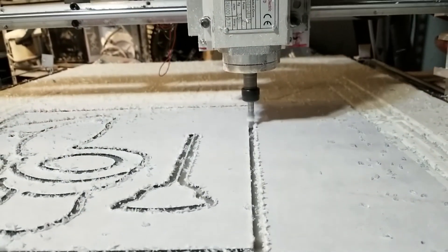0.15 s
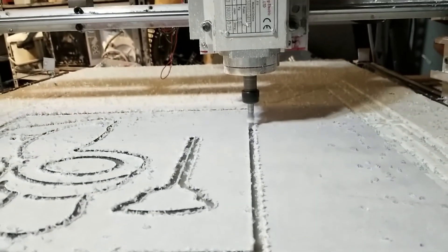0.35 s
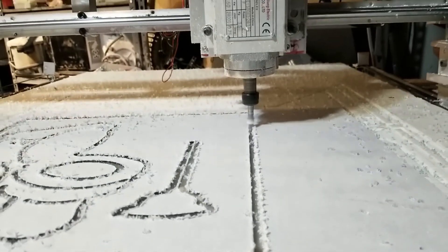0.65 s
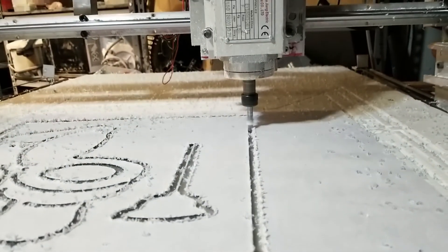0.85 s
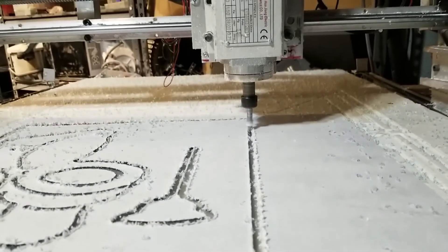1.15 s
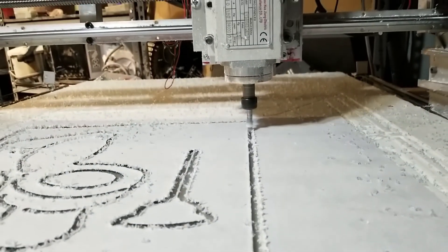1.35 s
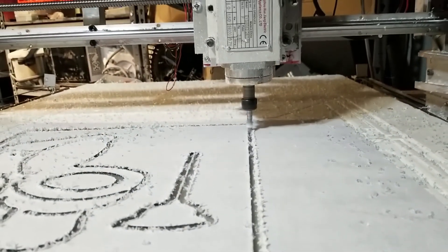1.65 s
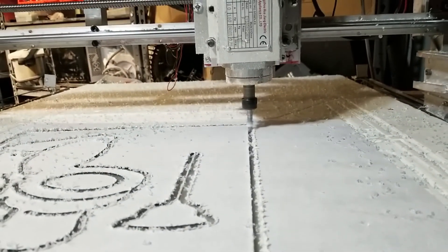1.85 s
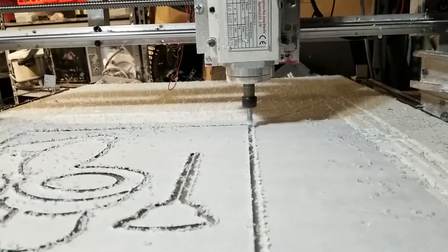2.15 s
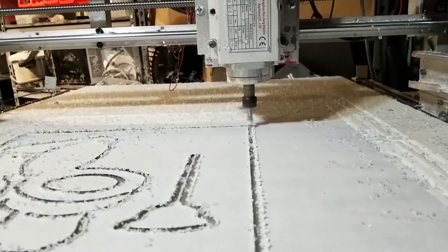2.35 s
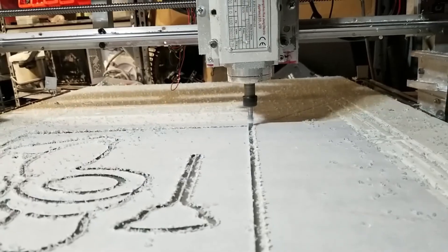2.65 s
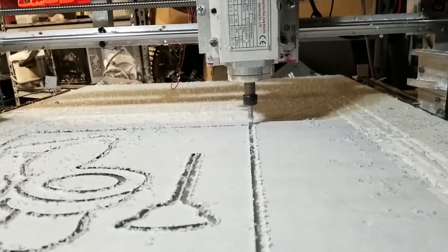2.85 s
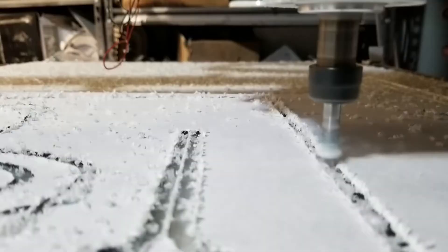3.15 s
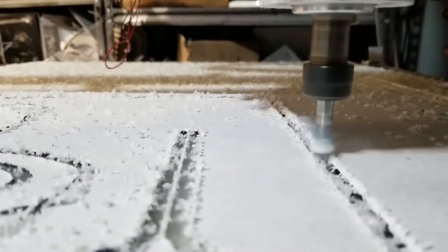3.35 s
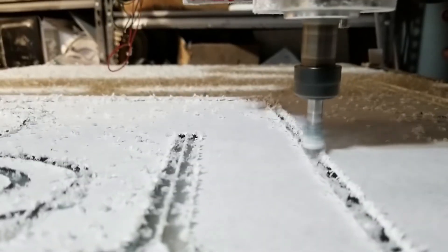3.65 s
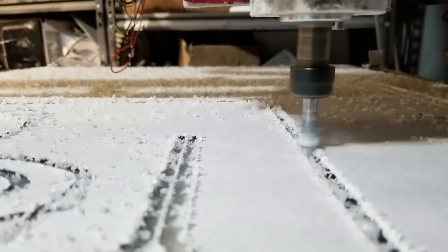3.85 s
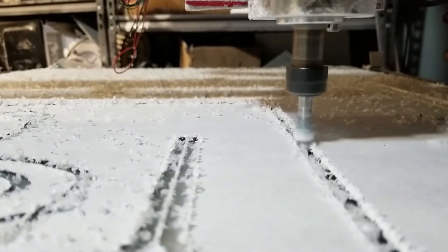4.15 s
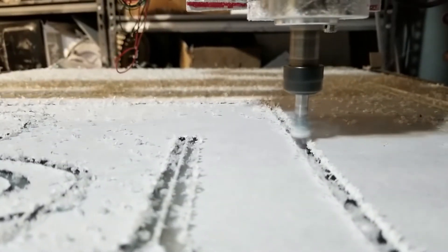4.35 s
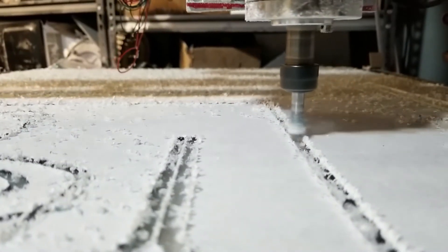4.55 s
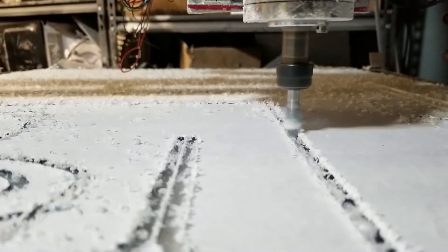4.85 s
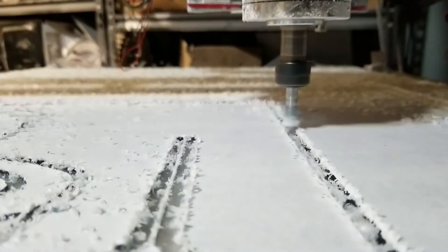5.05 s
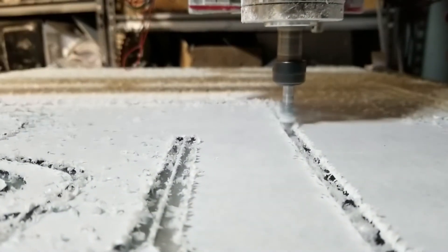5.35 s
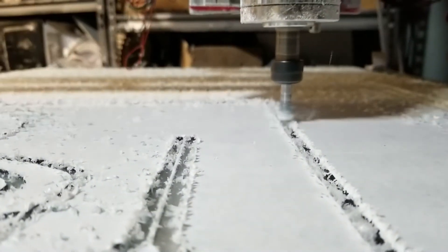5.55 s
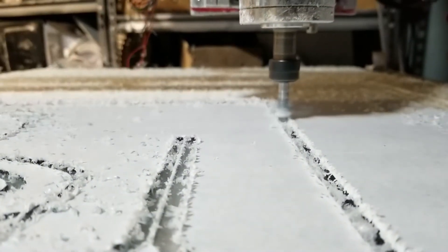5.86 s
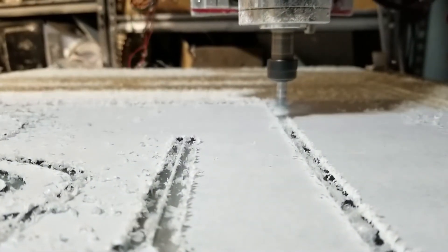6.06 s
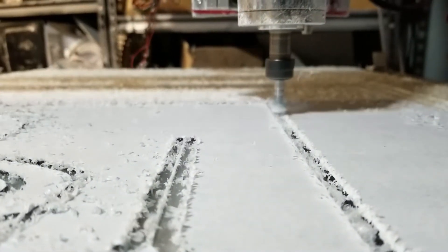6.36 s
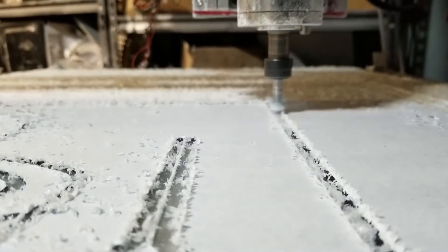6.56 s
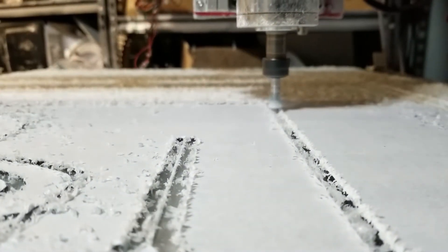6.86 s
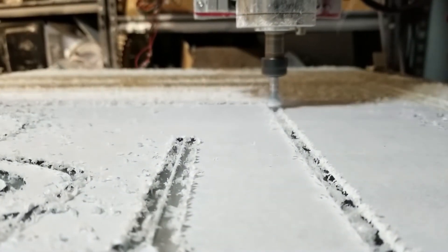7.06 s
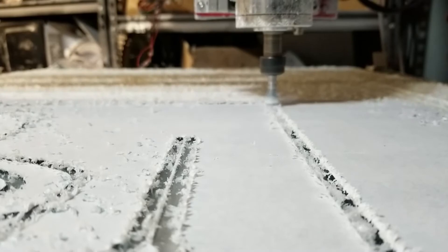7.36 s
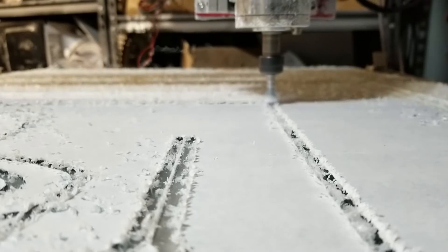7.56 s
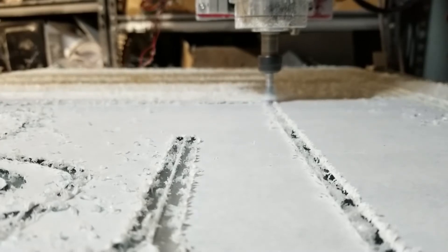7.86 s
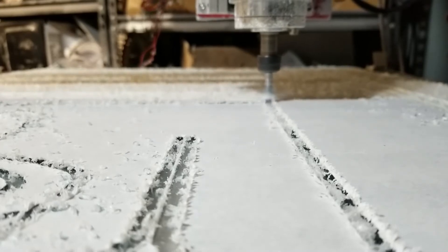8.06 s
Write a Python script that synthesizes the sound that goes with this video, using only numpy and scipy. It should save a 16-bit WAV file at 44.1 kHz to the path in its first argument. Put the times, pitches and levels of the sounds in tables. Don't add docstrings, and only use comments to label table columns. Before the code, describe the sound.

A steady router whine with bright, rapidly throbbing chip hiss, easing off briefly around three seconds, then returning closer before thinning again at the end.

```python
import sys
import numpy as np
from scipy import signal
from scipy.fft import rfft, irfft, next_fast_len
from scipy.io import wavfile
from scipy.ndimage import uniform_filter1d

SR = 44100
rng = np.random.default_rng(int(sys.argv[2]) if len(sys.argv) > 2 else 0)


def boost_factor(decibels):
    exponent = np.asarray(decibels, float) / 20
    return 10 ** exponent


def dump_mix(stems):
    frames = np.atleast_2d(stems).T
    limited = np.clip(frames, -1, 1)
    pcm = np.round(limited * 32767).astype(np.int16)
    wavfile.write(sys.argv[1], SR, pcm)


N = 362502
MOVE_S = 3.04


def rms_one(x):
    return x / np.sqrt(np.mean(x ** 2) + 1e-20)


def seconds():
    return np.arange(N) / SR


def in_time(rows):
    s, *columns = np.transpose(rows)
    return [np.interp(seconds(), s, c) for c in columns]


def at_hz(points, hz):
    table = np.array(points)
    return np.interp(np.log(hz), np.log(table[:, 0]), table[:, 1])


def spectrum_axis():
    size = next_fast_len(N)
    return size, np.arange(size // 2 + 1) * SR / size + 1


def drift(rate):
    r = np.exp(-80 * np.pi * rate / SR)
    white = rng.standard_normal(N // 40 + 2002)
    slow = signal.lfilter([1], [1, -2 * r, r * r], white)[2000:]
    return np.interp(np.arange(N) / 40, np.arange(len(slow)), rms_one(slow - slow.mean()))


def colour(x, spectrum, modes):
    size, hz = spectrum_axis()
    level_db = at_hz(spectrum, hz)
    for mode_hz, width_hz, db in modes:
        level_db = level_db + db / (1 + (2 * (hz - mode_hz) / width_hz) ** 2)
    return irfft(rfft(x, size) * boost_factor(level_db), size)[..., :N]


# time in seconds, share locked to the feed steps.
FEED_EVENNESS = [(0, 4.9), (2.6, 3), (2.8, 0.27), (3.04, 3.1), (8.22, 0.3)]


def throb():
    steps = 2 * np.pi * 40 * seconds() - .9 + 0.093 * drift(0.83)
    beat = np.sin(steps) + 0.28 * np.sin(2 * steps) + 0.083 * np.sin(3 * steps)
    beat = in_time(FEED_EVENNESS)[0] * beat
    lurch = np.cos(2 * np.pi * 24.0 * seconds() + 3.54 * drift(1.57))
    return 1.655 * np.tanh((beat + 2.03 * lurch + 1.23 * drift(70)) / 1.94)


# time in seconds, unbalance as first-order level in dB,
# flute load as fourth-order level in dB.
SPINDLE_SHAKE = [(0, -31, -33.5), (.8, -30, -35), (1.5, -32, -33.5), (2.2, -35.5, -30.5), (2.6, -33.5, -36),
                 (2.81, -33, -39.5), (2.91, -28, -42), (2.99, -33, -52), (3.036, -30.5, -45),
                 (3.046, -39, -32.5), (4.3, -35.5, -33.5), (5.4, -33.5, -31.5), (6.4, -31.5, -30.5),
                 (7.45, -38.5, -31), (7.85, -41.5, -32.5), (7.9, -43, -57), (8.11, -42, -41),
                 (8.18, -31.5, -47)]
# time
# in seconds, level in dB.
SECOND_ORDER = [(0, -36.5), (1.8, -32.5), (2.6, -37.5), (2.86, -45), (3.03, -40.5), (3.045, -95),
                (7.3, -52), (8.22, -65)]


def order_levels():
    t = seconds()
    first_db, fourth_db = in_time(SPINDLE_SHAKE)
    second_db, = in_time(SECOND_ORDER)
    node_db = -10.5 * np.exp(-((t - 2.33) / 0.087) ** 4)
    start_s, end_s, lurch_hz = 2.49, 2.85, 15.3
    free = (t > start_s) & (t < end_s)
    stutter_db = -20 * free * np.sin(np.pi * lurch_hz * (t - start_s)) ** 4
    levels = [first_db + node_db + 0.18 * stutter_db,
              second_db + node_db,
              fourth_db + stutter_db + 6.0 * free]
    return [db - 0.3 * drift(4.5) + 0.72 * drift(15.5) for db in levels]


# multiple of the spindle speed, level from far in dB, level from near in dB.
WEAK_ORDERS = [(3, -63, -58), (5, -52.5, -53), (6, -57, -56.5), (7, -57, -63), (8, -57, -58.5),
               (9, -74, -56.5)]
# multiple of the spindle speed,
# start in seconds, end in seconds, lift in dB.
SINGING_PANEL = [(3, -.3, 2.2, 14), (6, -.3, 1.2, 10), (7, 1.9, 2.5, 8), (7, 3.04, 4.6, 16),
                 (8, 1.8, 2.6, 6), (8, 3.8, 6.9, 7), (5, 2.45, 2.8, 9), (9, 3.04, 4.2, 5)]


def whine(turns, first_db, second_db, fourth_db, load):
    t = seconds()
    # multiple, level dB, shake dB, spread between the ports
    orders = [(1, first_db, 0.3, 0.3), (2, second_db, 1.63, 0.39), (4, fourth_db, 1.35, 0.16)]
    for k, far_db, near_db in WEAK_ORDERS:
        level_db = np.where(t < MOVE_S, far_db, near_db) + 0.33 * (fourth_db + 40)
        for multiple, a, b, lift_db in SINGING_PANEL:
            if multiple == k:
                level_db = level_db + lift_db * np.interp(t, [a - .05, a, b - .2, b + 0.13], [0, 1, 1, 0])
        orders.append((k, level_db, 3.5, .8))
    out, flutter_db = 0, 0.41 * drift(10)
    for k, level_db, shake_db, spread in orders:
        flutter = flutter_db * (1.6 if k == 1 else 1)
        gain = np.sqrt(2) * boost_factor(level_db + shake_db * load + flutter)
        angle = 2 * np.pi * (k * turns + rng.random()) + 0.092 * drift(28)
        out = out + gain * (np.sin(angle) + spread * np.cos(angle) * [[1], [-1]])
    return out


def flute_strikes(turns):
    far = seconds() < MOVE_S
    sharp = np.clip(np.where(far, 0.82, 0.24) + 0.32 * drift(1.1), 0, 1)
    turn = (turns + .02 * drift(30)).astype(int)
    strength = boost_factor(2.0 * rng.standard_normal(turn.max() + 1))[turn]
    struck = (np.diff(turn, prepend=0) > 0) * strength
    puff = np.exp(-4.0 * (turns % 1)) + 0.079 * np.exp(-5.0 * ((turns + 0.9) % 1))
    gate = (1 - sharp) + sharp * rms_one(strength * puff)
    chip_size = boost_factor(1.8 * np.minimum(rng.exponential(1, N), 4))
    chips = (rng.random(N) < 1500.0 / SR) * rng.standard_normal(N) * chip_size
    noise = rng.standard_normal((3, N)) * gate
    direct = rms_one(noise[0]) + 1.85 * rms_one(struck) + 0.14 * rms_one(chips)
    return rms_one(direct), rms_one(noise[1:])


def echoes(size):
    t = np.arange(SR // 50) / SR
    scatter = rng.standard_normal((2, len(t))) * np.exp(-t / 0.0035)
    scatter[:, 0] += 8.0
    return rfft(scatter / np.linalg.norm(scatter, axis=1, keepdims=True), size)


# frequency in Hz, level in dB per Hz.
TOOL_SPECTRUM = [(2060, -23), (3500, -12.5), (4380, -12.5), (5520, 2.5), (5880, -2), (6310, -13.5),
                 (6770, -1.5), (8640, -7.5), (9270, -7.5), (11600, -5.5), (15100, -8.5), (15700, 4.5),
                 (16200, -44)]
# frequency in Hz, width in Hz, lift in dB.
TOOL_RESONANCES = [(5594, 160, 3.5), (5940, 88, -1.5), (6302, 180, 10), (7640, 31, -15), (9400, 160, 4),
                   (10100, 130, 0), (11200, 160, 0.5)]
# frequency in Hz, direct share from 0 to 1.
TOOL_DIRECT_SHARE = [(3500, 0.83), (6000, 1), (10000, 0.68), (16000, 0)]


def tool_response(direct, diffuse):
    size, hz = spectrum_axis()
    share = np.clip(at_hz(TOOL_DIRECT_SHARE, hz), 0, 1)
    alike = rfft(colour(direct, TOOL_SPECTRUM, TOOL_RESONANCES), size) * echoes(size)
    unlike = rfft(colour(diffuse, TOOL_SPECTRUM, TOOL_RESONANCES), size)
    return np.sqrt(share) * alike + np.sqrt(1 - share) * unlike


# time in seconds, level in dB.
CUT_DEPTH = [(0, -21.5), (.4, -22), (.96, -18.5), (1.5, -22), (2.15, -18), (2.42, -23), (2.46, -30),
             (2.56, -48), (2.95, -37.5), (3.036, -38), (3.044, -19), (4.1, -17.5), (5.8, -19.5),
             (6.6, -16.5), (7.74, -21), (7.78, -29), (7.89, -43), (8.15, -30)]
# time in seconds, centre of the ring in Hz, centre of the hiss in Hz.
TOOL_TRAVEL = [(0, 6000, 12500), (1.0, 5900, 10800), (2.4, 6240, 9000), (3.0, 5950, 9550),
               (3.07, 5600, 12300), (4.1, 6250, 12300), (5.4, 5620, 10950), (6.5, 5550, 12740),
               (8.22, 5870, 9500)]


def cutter(turns, load):
    hiss_db, = in_time(CUT_DEPTH)
    ring_hz, centre_hz = in_time(TOOL_TRAVEL)
    far = seconds() < MOVE_S
    ring_db = np.where(far, -4, -3) - 20.5 + 0.72 * (hiss_db + 20.5)
    depth_db = np.where(far, 4, 2.5)
    left, right = tool_response(*flute_strikes(turns))
    size, hz = spectrum_axis()
    place = 11 * np.log(hz / 3400) / np.log(16600 / 3400)
    ring, hiss = 0, 0
    for k in range(12):
        mask = np.cos(np.pi / 2 * np.clip(place - k, -1, 1)) ** 2
        band_hz = hz[mask.argmax()]
        near, even, odd = irfft(np.array([left, right, -1j * right]) * mask, size)[:, :N]
        turned = rng.uniform(-np.pi, np.pi) + 0.95 * drift(0.32)
        part = np.array([near, even * np.cos(turned) + odd * np.sin(turned)])
        part[1] *= near.std() / even.std()
        level_db = depth_db * (0.73 * load + 0.74 * drift(57)) + 1.0 * drift(3.8)
        if k < 6:
            level_db += 3.1 * np.exp(-(np.log(band_hz / ring_hz) / 0.12) ** 2)
            ring = ring + part * boost_factor(level_db)
        else:
            level_db += 0.069 * (k - 6) * np.minimum(hiss_db + 44, 0)
            level_db += 10.4 * np.exp(-(np.log(band_hz / centre_hz) / 0.57) ** 2)
            hiss = hiss + part * boost_factor(level_db)
    return boost_factor(ring_db) * rms_one(ring) + boost_factor(hiss_db) * rms_one(hiss)


def panel_bounce(x):
    out, at = x.copy(), np.arange(N)
    for lag_s, share in [(3.3e-4, 0.16), (8.5e-4, -0.28)]:
        late = at - lag_s * SR * (1 + .15 * drift(0.5))
        out += share * np.array([np.interp(late, at, side) for side in x])
    return out / 1.26


# mode in Hz, start in seconds, end in seconds, lift in dB.
PANEL_MODES = [(1850, 1, 3.56, 2), (2095, 3.8, 6.9, -1.5), (1580, 0.5, 1.2, 2), (1985, -1.8, 1.1, 5),
               (2090, 3.5, 2.35, -3), (1300, 8, 2.75, -7), (14700, 6.5, 6.7, 2), (12800, 6, 4.6, -7),
               (5620, 7, 8.1, -13), (6330, 2, 4.8, -6), (6250, 3, 8.03, 3.5), (13000, -3.5, 1.6, -2),
               (12700, 5.5, 3.64, 5), (10100, 9, 6.2, -6), (8300, 1, 1.34, 7.5), (9500, 3, 1.94, -6),
               (9500, 4.7, 3.3, -20), (9100, 3.5, 6.7, -7), (11480, 1.5, 4.5, -9), (11550, 6.5, 7, -0.5),
               (11660, 0.4, 2.0, 0)]


def panel_ring(x):
    out, t = x.copy(), seconds()
    q, ease_s = 25.7, 0.095
    for hz, a, b, db in PANEL_MODES:
        span = slice(max(round((a - ease_s) * SR), 0), round((b + ease_s) * SR))
        ease = np.interp(t[span], [a - ease_s, a, b, b + ease_s], [0, 1, 1, 0])
        out[:, span] += boost_factor(db) * ease * signal.lfilter(*signal.iirpeak(hz, q, fs=SR), x[:, span])
    dimmed = signal.lfilter(*signal.iirpeak(3620, 6.7, fs=SR), x)
    return out - 0.61 * (t < 2.5) * dimmed


# time in seconds, peak in dB, ring in Hz.
LAST_BITES = [(0.6773, 5, 6600), (2.054, -3, 9800), (2.2528, 0, 9100), (2.2798, -2, 8290), (2.303, 0, 9400),
              (2.3333, 3, 10100), (2.35, -7, 7260), (2.3793, 4, 8300), (2.4024, 2, 9240), (2.4302, 6, 6230),
              (2.4627, -8, 6400), (2.4892, 0.5, 9500), (2.5388, -5, 6450), (3.045, -3, 10100),
              (7.1, -5, 5600), (7.381, 0.5, 10800), (7.5994, -17, 5280), (7.6297, -13, 5400),
              (7.719, 0, 10300), (7.773, -8, 10000), (7.826, -6, 9500), (7.8635, -9, 9500),
              (7.918, -21.5, 9500), (7.929, -13, 9900), (7.985, -9, 5750), (7.997, -16, 5650),
              (8.006, -7, 5700)]


def bites(turns):
    out, length = np.zeros((2, N + SR)), SR // 16
    fade = np.exp(-np.arange(length) / (.011 * SR))
    for s, peak_db, ring_hz in LAST_BITES:
        at = round(s * SR)
        since = (turns[at:at + length] - turns[at]) % 1
        noise = rng.standard_normal((3, length))
        tear = (noise[0] + 0.88 * noise[1:]) * fade * (0.075 + np.exp(-8.0 * since))
        broad_band = signal.butter(2, [4800, 15000], "band", fs=SR, output="sos")
        ring_band = signal.butter(2, [0.87 * ring_hz, 1.14 * ring_hz], "band", fs=SR, output="sos")
        broad = 0.58 * (ring_hz / 9000) ** 2 * signal.sosfilt(broad_band, tear)
        narrow = 2.1 * signal.sosfilt(ring_band, tear)
        out[:, at:at + length] += boost_factor(peak_db - 8.0) * (broad + narrow)
    return out[:, :N]


# time in seconds, whistle in dB, growl in dB.
GANTRY_MOTOR = [
    (2.78, -47, -49),
    (2.792, -67, -53),
    (2.858, -43, -33),
    (2.896, -27, -46),
    (2.948, -35, -44),
    (3.006, -60, -49),
    (3.035, -59, -41.5),
]
# frequency in Hz, level in dB.
MOTOR_TONES = [(983, 0.5), (1210, -14), (780, -17.5), (470, -1.5), (428, -2), (154.6, -11)]
# frequency in Hz, level in dB.
FAN_HUM = [(75.4, -63), (166.9, -61)]


def gantry():
    t = seconds()
    before, after = (GANTRY_MOTOR[0][0] - .05, -90, -90), (GANTRY_MOTOR[-1][0] + .01, -90, -90)
    whistle_db, growl_db = in_time([before, *GANTRY_MOTOR, after])
    tones = 0
    for hz, db in MOTOR_TONES:
        swell_db = growl_db if hz < 600 else whistle_db
        tones = tones + boost_factor(db + swell_db + 2.0 * drift(19)) * np.sin(2 * np.pi * hz * t)
    for hz, db in FAN_HUM:
        angle = 2 * np.pi * hz * t + 0.42 * drift(1.5)
        tones = tones + boost_factor(db + table_sway() + 2.0 * drift(4.5)) * np.sin(angle)
    since = t - MOVE_S
    knock = boost_factor(-31) * np.exp(-(since / 0.0019) ** 2) * np.sin(2 * np.pi * 180.0 * since)
    click = boost_factor(-16) * np.exp(-(since / 4e-5) ** 2)
    return np.sqrt(2) * tones + knock + click


def table_sway():
    first_db = uniform_filter1d(in_time(SPINDLE_SHAKE)[0], size=SR // 4)
    return 0.36 * (first_db - first_db.mean())


# frequency in Hz, left-right likeness.
PORT_LIKENESS = [(60, 0.63), (180, -0.046), (550, 0.73), (1650, 0.15), (4970, 0.065), (15000, -0.12)]


def two_ports(direct, diffuse, lag_s):
    size, hz = spectrum_axis()
    alike = np.clip(at_hz(PORT_LIKENESS, hz), 0, 1)
    late = np.exp(-2j * np.pi * hz * lag_s * np.array([[1], [0]]))
    both = np.sqrt(alike) * rfft(direct, size) * late + np.sqrt(1 - alike) * rfft(diffuse, size)
    return irfft(both, size)[:, :N]


# frequency in Hz, level in dB per Hz.
HOUSING_SPECTRUM = [(500, -48.5), (850, -42.5), (1050, -0.5), (1190, -15.5), (1290, -10), (1460, -16.5),
                    (2880, -19), (3600, -21.5), (5470, -16.5), (8640, -22.5), (11300, -24), (14700, -46),
                    (16200, -11.5)]
# frequency in Hz, width in Hz, lift in dB.
HOUSING_RESONANCES = [(1003, 15, 12), (1278, 32, 4), (2082, 290, 3.5), (2600, 38, 2.5), (2770, 160, 7.5),
                      (3150, 113, 8.5), (12700, 3000, -13)]
# frequency in Hz, level in dB per Hz.
RUMBLE_SPECTRUM = [(20, -22), (100, -16.5), (200, -8), (290, -0.5), (400, -20.5), (500, -4.5), (720, -1),
                   (900, -7), (1200, -16)]
# frequency in Hz, level in dB per Hz.
DRONE_SPECTRUM = [(250, -22), (320, 1.5), (400, -1), (480, 2), (640, -64)]
# time in seconds, level in dB.
DRONE_LEVEL = [(0, -55), (1.4, -52), (2.8, -40), (3.1, -49.5), (4.0, -49), (5.3, -57), (6.6, -60),
               (7.7, -49.5), (7.92, -44)]


def housing(load):
    housing_db = -34.5 + 0.46 * (in_time(SPINDLE_SHAKE)[1] + 33)
    table_db, drone_db = -46 + table_sway(), in_time(DRONE_LEVEL)[0]
    noise = two_ports(rng.standard_normal(N), rng.standard_normal((2, N)), 3e-5)
    air = rms_one(colour(noise, HOUSING_SPECTRUM, HOUSING_RESONANCES))
    rumble = rms_one(colour(noise, RUMBLE_SPECTRUM, []))
    drone = rms_one(colour(noise, DRONE_SPECTRUM, []))
    return (air * boost_factor(housing_db + 5 + 1.1 * load + 1.0 * drift(11.0))
            + rumble * boost_factor(table_db + 8.5 + 1.2 * drift(11.5))
            + drone * boost_factor(drone_db - 4.5 + 4.1 * drift(19)))


# time in seconds, turns per second.
SPINDLE_SPEED = [(0, 262.2), (2.35, 262.2), (2.6, 264), (3.03, 264), (3.05, 262.9), (7.75, 263.0),
                 (7.95, 264.2), (8.22, 264.2)]


def scene():
    turns = np.cumsum(in_time(SPINDLE_SPEED)[0]) / SR
    load = throb()
    shake = np.roll(load, round(0.0051 * SR))
    through_panel = panel_ring(panel_bounce(cutter(turns, load)) + housing(shake))
    return whine(turns, *order_levels(), shake) + through_panel + bites(turns) + gantry()


def low_pass(x):
    return signal.sosfilt(signal.butter(12, 16150, fs=SR, output="sos"), x)


def record(dry):
    top_cut = signal.cheby2(14, 60, 16200, fs=SR, output="sos")
    rounded = .85 * np.tanh(dry / .85)
    return low_pass(signal.sosfilt(top_cut, rounded))


dry = scene()
out = record(dry)
dump_mix(out)
```